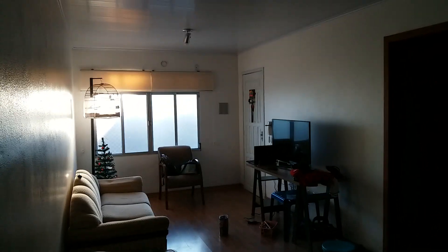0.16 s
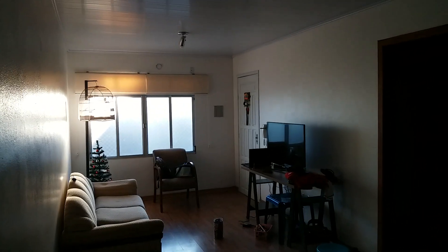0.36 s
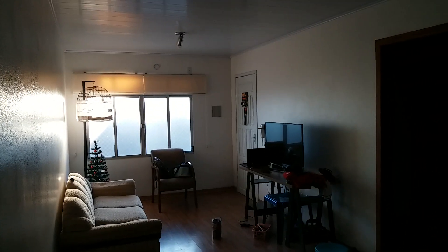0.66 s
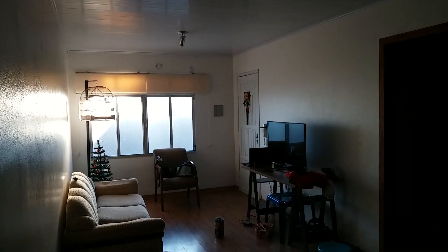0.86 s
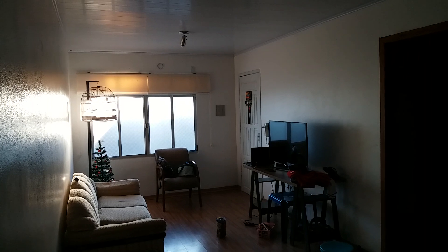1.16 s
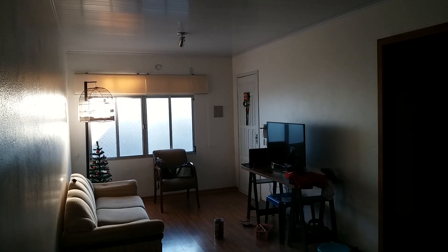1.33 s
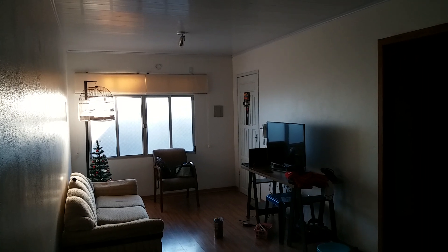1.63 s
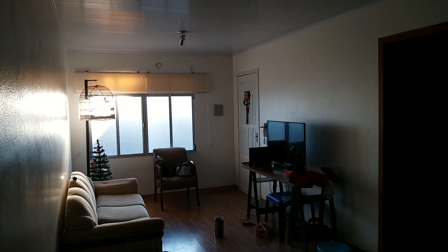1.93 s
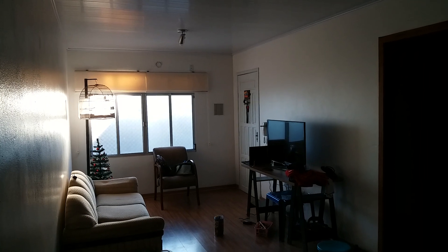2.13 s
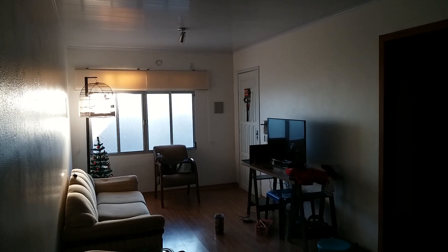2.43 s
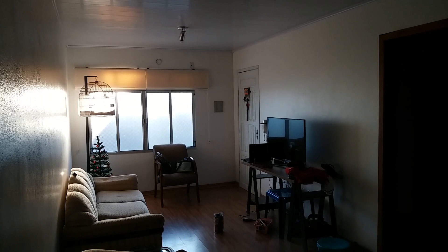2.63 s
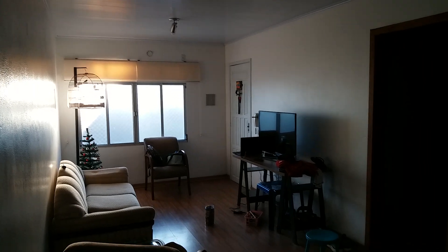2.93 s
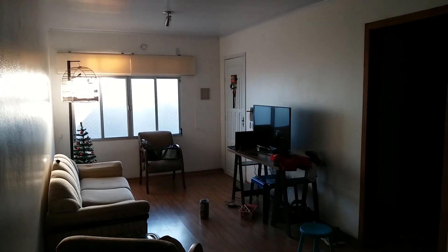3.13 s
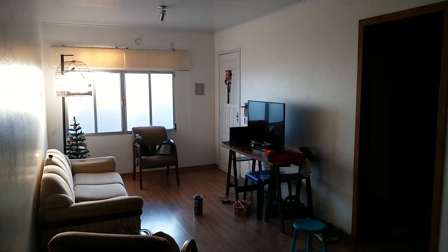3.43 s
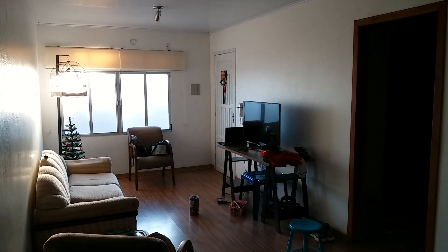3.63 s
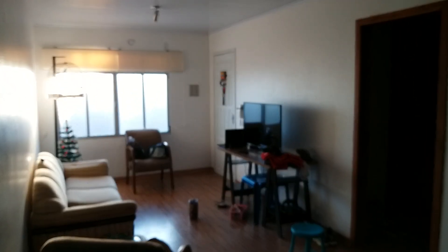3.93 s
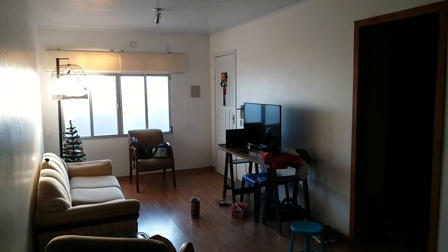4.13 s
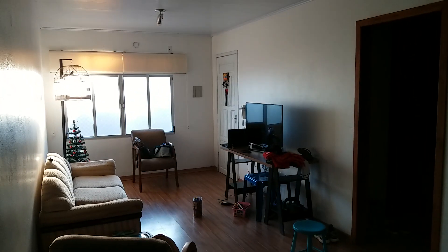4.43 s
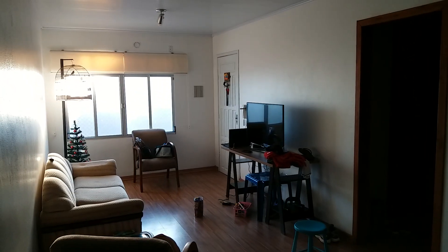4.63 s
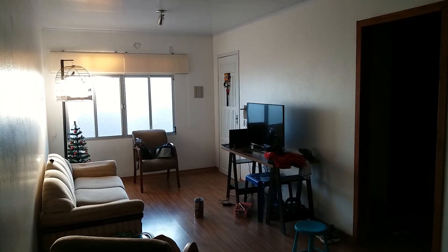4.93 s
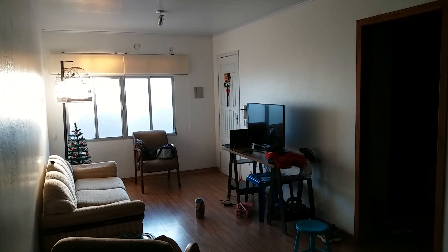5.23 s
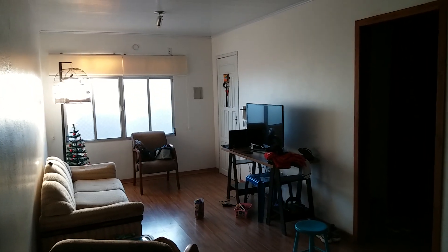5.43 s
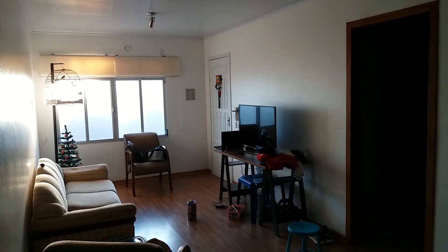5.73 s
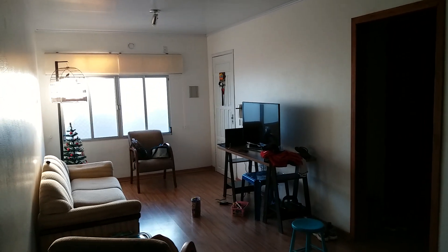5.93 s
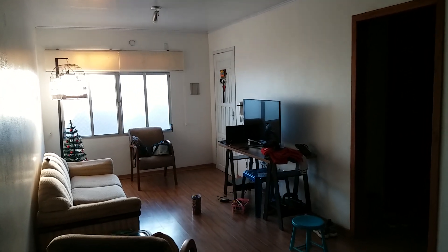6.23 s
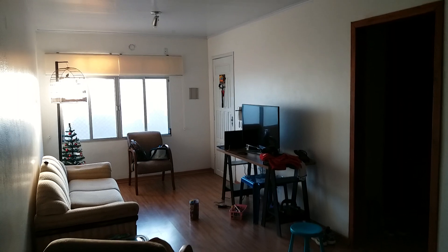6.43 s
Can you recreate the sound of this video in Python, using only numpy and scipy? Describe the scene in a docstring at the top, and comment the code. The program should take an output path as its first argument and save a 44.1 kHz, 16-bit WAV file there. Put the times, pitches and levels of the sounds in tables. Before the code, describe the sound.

Handheld phone in a sparse room, caged finch some metres away. First there is mostly low room tone, a tiny tick, a soft rustle and faint outdoor chirps. A brief raspy call comes early, then a fast tumbling twitter, strongest in its first half, higher and more scattered later. The echo fades into quiet before small taps and a sharp close knock on the left.

```python
"""Caged finch in a ringing room

One harsh call of rasping noise, then a fast song of gliding, buzzing tones with overtones and breath, mostly
room echo: dense decaying noise convolved with the dry bird. Faint far birds are smeared outdoors first.
Underneath lie filtered-noise rumble and hiss, a thin wavering hum, airy rustles and the knocks of fingers
on the phone. An expander leaves quiet passages a little lower than loud ones."""
import sys
import numpy as np
from scipy import signal
from scipy.fft import rfft, irfft, next_fast_len
from scipy.io import wavfile
from scipy.ndimage import uniform_filter1d, map_coordinates

SR = 44100
rng = np.random.default_rng(int(sys.argv[2]) if len(sys.argv) > 2 else 0)


def store_pcm(level_fs):
    """Save levels as 16-bit WAV."""
    pcm = np.round(np.clip(level_fs, -1, 1) * 32767).astype(np.int16)
    wavfile.write(sys.argv[1], SR, np.atleast_2d(pcm).T)


N = 289737

# Levels are those of each source, ahead of the room, the stereo balance and the expander.
# Background colour: pitch_hz, relative level_db
BACKGROUND_COLOUR = [(36, -30.5), (62, -2.5), (100, 0), (165, -2), (300, -10), (600, -19), (1500, -23.5),
                     (2600, -28.5), (4100, -35.5), (6500, -40.5), (12000, -39), (15700, -34.5)]
BACKGROUND_DB = -54.5  # rms of rumble and hiss before the stereo balance
# Hum lines: pitch_hz, rms level_db before the waver, waver_db
HUM_LINES = [(386.5, -74, 2), (773, -63, 2.5)]
# Likeness of left and right in the rumble and hiss: pitch_hz, correlation (-1 to 1)
LEFT_RIGHT_LIKENESS = [(150, 1), (300, .62), (700, 0.44), (1400, -0.25)]
# Stereo balance of the background: pitch_hz, left_over_right_db
BACKGROUND_BALANCE = [(60, 1.5), (300, 3), (750, -1.5), (1400, 1), (4000, 0.5)]
# Fingers on the phone: start_s, level_db, knock pitch_hz
FINGER_TICKS = [(0.384, -36, 6200), (5.957, -31, 2100), (6.473, -36.5, 2480), (6.479, -26, 2270),
                (6.538, -45.5, 2200), (6.5445, -37, 8000), (6.5685, -2.5, 1750)]
# Soft rustles near the phone: centre_s, spread_s, level_db before the flutter
SOFT_RUSTLES = [(0.264, 0.049, -62), (2.75, 0.1, -64.5)]
# Colour of the rustles: pitch_hz, relative level_db
RUSTLE_COLOUR = [(1500, -7), (4000, -12), (8000, -15), (15700, -10.5)]

# One slow wavering whistle far off, point by point: time_s, pitch_hz, level_db
FAR_WHISTLE = [(.005, 2894, -73), (.11, 3110, -77), (.25, 2830, -74), (.4, 1987, -76.5), (.6, 2840, -75)]
# One far chirp, repeated: start_s, top pitch_hz, loudest level_db
FAR_CHIRPS = [(.6, 4190, -75), (.87, 4280, -74.5), (1.17, 4260, -75.5), (1.441, 4210, -75.5),
              (2.27, 4135, -76)]
# Far rising whistles, loudest at once: start_s, length_s, first_hz, last_hz, loudest level_db
FAR_RISES = [(2.947, .12, 1727, 2220, -68.5), (3.437, 0.073, 4320, 4820, -71.5),
             (3.867, 0.16, 1670, 2185, -61.5)]
CHIRP_S, CHIRP_SAG_HZ = 0.073, 218  # length of a chirp, and its whole fall in pitch
CHIRP_LOUDEST = 0.1  # share of the length
CHIRP_SLOPE_DB_PER_S, RISE_SINK_DB_PER_S = 105, 68  # a chirp's swell and fall; a rising whistle's fall

# Stereo balance towards the cage: pitch_hz, left_over_right_db
CAGE_BALANCE = [(2400, -2), (5000, -1), (8500, 11.5), (15000, 0)]
# Echo decay: pitch_hz, t60_s
ROOM_DECAY = [(3000, 0.57), (6000, 0.5), (12000, 0.46)]

# The harsh call's swell, point by point: time_s, level_db
CALL_LEVEL = [(1.655, -61), (1.685, -45.5), (1.738, -43), (1.77, -64)]
# Colour of the call's rasp: pitch_hz, relative level_db
RASP_COLOUR = [(710, -58), (1200, -25), (1900, -11), (2800, 5), (4300, 8.5), (5900, -0.5), (7200, -19),
               (11900, -14.5), (15600, -28)]
# The song, one row a note: start_s, length_s, first_hz, middle_hz, last_hz, loudest level_db,
# loudest point (share 0-1 of the length), buzz depth_hz, overtone boost_db
SONG_NOTES = [ (2.893, 0.12, 3150, 3150, 3050, -42.5, 0.5, 32, -5.5),
              (2.978, 0.087, 2977, 3190, 3730, -36, 0.83, 1, 10),
              (3.217, 0.042, 2804, 2980, 3530, -41, .8, 56, -4),
              (3.242, 0.054, 3434, 3350, 2700, -35, 0.66, 27, 8.5),
              (3.338, .12, 2842, 3132, 3554, -17.5, 0.69, 5, 1.5),
              (3.561, 0.069, 2772, 3107, 3535, -18, 1, 40, -4),
              (3.613, 0.065, 3340, 4134, 5740, -19, 0, 99, 9),
              (3.69, 0.089, 4430, 3902, 3244, -24, 0.54, 100, 6),
              (3.709, 0.043, 3530, 3775, 3930, -13, 0, 36, -4),
              (3.738, 0.076, 3480, 3230, 3090, -16.5, 0.1, 7.2, -3),
              (3.875, 0.059, 2776, 2873, 2700, -35.5, 0, 180, 11),
              (3.878, 0.082, 5270, 4863, 4070, -27, 1, 670, 12.5),
              (3.95, 0.045, 3670, 3247, 3020, -16.5, 0.1, 69, -1.5),
              (3.996, 0.063, 3003, 3033, 3330, -15.5, 1, 1.2, -5.5),
              (4.106, 0.071, 3497, 4080, 3920, -17, 0.5, 50, 5.5),
              (4.169, 0.067, 3870, 3992, 4060, -16.5, 0.35, 0.98, 4),
              (4.156, 0.046, 4620, 4700, 5100, -34, 0.5, 140, -2.3),
              (4.232, 0.046, 3587, 3585, 3590, -20.5, 0.4, 128, 3.8),
              (4.28, 0.084, 3522, 2950, 2965, -21.5, 0.54, 11.4, -3),
              (4.311, 0.05, 4680, 5200, 5720, -31, 0.5, 380, 3),
              (4.326, 0.051, 3280, 3500, 3850, -18, 0.98, 60, 2),
              (4.373, 0.074, 3810, 4432, 4656, -14, 0.56, 40, -2),
              (4.359, 0.054, 8530, 7630, 7000, -37, .95, 220, 7),
              (4.455, 0.12, 5650, 5710, 5440, -23.5, 0.68, 300, 5.5),
              (4.516, 0.028, 7400, 6690, 6470, -19, 0.1, 400, 0),
              (4.545, 0.026, 6160, 5770, 5790, -14.5, 0.3, 330, -3.7),
              (4.514, 0.033, 9470, 8240, 7000, -38, 0.2, 62, 0),
              (4.577, 0.081, 5025, 4860, 4680, -22.5, 0.5, 150, -0.2),
              (4.592, 0.043, 3725, 3815, 3840, -17, 0.4, 60, -7),
              (4.607, 0.044, 3490, 3373, 3210, -19.5, 0.12, 121, -11),
              (4.659, 0.03, 7380, 7390, 7170, -33, 0, 210, 0.5),
              (4.728, 0.04, 4910, 4874, 4810, -19, 0.94, 58, -1.5),
              (4.778, 0.026, 7790, 6840, 6000, -27, 0.99, 400, 6.5),
              (4.842, 0.045, 5590, 5190, 4960, -23, 0.9, 170, -3.5),
              (4.885, 0.051, 4850, 3990, 3450, -32, 0.2, 44, 5.2),
              (4.966, 0.041, 6420, 6100, 5720, -43.5, .6, 300, -3),
              (4.999, 0.064, 3966, 3720, 3640, -29.5, 0.19, 500, -5),
              (5.07, 0.051, 4474, 4310, 4280, -26, 0.53, 86, -4.5),
              (5.137, 0.097, 8120, 6210, 5290, -28.5, 0.55, 250, -1.5),
              (5.267, 0.089, 3674, 3388, 2990, -32.5, 0.3, 250, -22),
              (5.368, 0.063, 4460, 4230, 4276, -27, 0.22, 16, -5.5),
              (5.433, 0.066, 6860, 7605, 6780, -31.5, 0.26, 320, 0),
              (5.482, 0.034, 6440, 5620, 5300, -28, 0.4, 180, -2.8),
              (5.502, 0.066, 5316, 5160, 4990, -23.5, 0, 30, -12),
              (5.582, 0.064, 7430, 6285, 4410, -23, 0.96, 220, -7),
              (5.647, 0.025, 3713, 4000, 4090, -23.5, 0.71, 120, -3),
              (5.672, 0.067, 3584, 3067, 3325, -32.5, 0.34, 1.2, -27),
              (5.767, 0.15, 4748, 4995, 4850, -26.5, 0.18, 44, -4.5),
              (5.827, 0.071, 3595, 3596, 4280, -35, 0.31, 49, 2),
              (5.86, 0.1, 2663, 2798, 2800, -39.5, 0.4, 36, -5), ]
# Song overtones: multiple, level_db for a 4 kHz note before the boost, slope_db per octave of pitch
SONG_OVERTONES = [(2, -36, 24), (3, -31, -5.5), (4, -47.5, -20)]
# Colour of the air past the syrinx: pitch_hz, relative level_db
BREATH_COLOUR = [(900, -18.5), (2500, 1), (8000, -28), (12000, 3), (15700, -0.5)]
SWELL_DB_PER_S, SINK_DB_PER_S = 259, 246.5  # a song note's rise to its loudest point, and fall from it
TOP_HZ = 15760  # band limit of the whole sound


def amp(db):
    """Decibels to amplitude."""
    return 10 ** (np.asarray(db) / 20)


def unit(x):
    """x scaled to an rms of 1."""
    return x / np.sqrt(np.mean(x ** 2) + 1e-20)


def along(points, hz):
    """A curve through (pitch_hz, value) points on a log axis."""
    f, v = np.transpose(points)
    return np.interp(np.log(hz + 1), np.log(f + 1), v)


def wobble(rate):
    """A smooth random curve with rate knots a second."""
    knots = rng.standard_normal(int(N * rate / SR) + 4)
    return map_coordinates(knots, [np.arange(N) * rate / SR])


def filtered(x, response):
    """x shaped by a response of frequency."""
    m = next_fast_len(N + SR // 2)
    return irfft(rfft(x, m) * response(np.fft.rfftfreq(m, 1 / SR)), m)[..., :N]


def leaning(points):
    """Left and right gains that split a balance in dB evenly between the sides."""
    return lambda hz: amp(np.outer([.5, -.5], along(points, hz)))


def coloured(spectrum, channels):
    """Filtered noise with an rms of 1."""
    noise = rng.standard_normal((channels, N))
    return unit(filtered(noise, lambda hz: amp(along(spectrum, hz))))


def rumble_and_hiss():
    """Patchy coloured noise, the same on both sides in the bass and wider above."""
    z = signal.stft(rng.standard_normal((2, N)), nperseg=512)[2]
    # random patches, smoothed over frequency and then over time
    patches = rng.standard_normal(z.shape[1:])
    patches = uniform_filter1d(uniform_filter1d(patches, 8, 0), 20, 1)
    pair = signal.istft(z * amp(1.1 * unit(patches)), nperseg=512)[1][:, :N]

    def mid_side_gains(hz):
        # cos^2 - sin^2 of this angle gives the wanted left-right correlation
        angle = np.arccos(np.clip(along(LEFT_RIGHT_LIKENESS, hz), -1, 1)) / 2
        return amp(along(BACKGROUND_COLOUR, hz)) * [np.cos(angle), np.sin(angle)]

    mid, side = filtered(pair, mid_side_gains)
    return amp(BACKGROUND_DB) * unit(np.array([mid + side, mid - side]))


def hum():
    """Thin sine lines that waver slowly in level and phase."""
    t = np.arange(N) / SR
    out = np.zeros(N)
    for hz, db, waver_db in HUM_LINES:
        level = np.sqrt(2) * amp(db + waver_db * wobble(3.494))
        out += level * np.sin(2 * np.pi * hz * t + 0.17 * wobble(9.2))
    return out


def background():
    """Rumble, hiss and hum under one stereo balance that varies with frequency."""
    return filtered(rumble_and_hiss() + hum(), leaning(BACKGROUND_BALANCE))


def rustles():
    """Brief soft swells of airy noise with a fast flutter in level."""
    t = np.arange(N) / SR
    swells = sum(amp(db) * np.exp(-((t - s) / spread) ** 2) for s, spread, db in SOFT_RUSTLES)
    return swells * amp(1.9 * wobble(60)) * coloured(RUSTLE_COLOUR, channels=2)


def ticks():
    """Each contact is a knock of a few cycles with a noisy crack, stronger at the left port."""
    out, t = np.zeros(N + SR), np.arange(400) / SR
    for s, db, hz in FINGER_TICKS:
        knock = np.sin(2 * np.pi * hz * t) * amp(-9 * hz * t)  # loses 9 dB a cycle
        crack = 0.12 * amp(-60 * t / 0.007) * rng.standard_normal(len(t))
        attack = np.minimum(hz * t, 1)  # one cycle long
        out[round(s * SR):][:len(t)] += amp(db) * attack * (knock + crack)
    return out[:N] * amp([[0], [-10]])


def note(start, length, first_hz, middle_hz, last_hz, db, loudest, swell_db, sink_db):
    """Pitch bends as a parabola through three pitches; level swells to its loudest point, then sinks."""
    u = np.linspace(0, 1, 2 * 10 + 1)
    bend = (2 * middle_hz - first_hz - last_hz) * 2 * u * (1 - u)
    hz = first_hz + (last_hz - first_hz) * u + bend
    late = (u - loudest) * length  # seconds after the loudest point
    drop_db = np.where(late < 0, -swell_db * late, sink_db * late)
    return list(zip(start + u * length, hz, db - drop_db))


def whistles(notes, overtones, waver, buzz_rate, fade):
    """Gliding tones whose pitch a buzz shakes fast and unevenly; returns them and the flow of air."""
    out, effort = np.zeros(N), np.zeros(N)
    shake = 2 * np.tanh(wobble(buzz_rate) / 2)  # soft-limited to within +-2
    for shape, buzz, rich_db in notes:
        s, *cols = np.transpose(sorted(shape))
        n = np.arange(round(s[0] * SR), round(s[-1] * SR))
        hz, db = [np.interp(n / SR, s, c) for c in cols]
        pitch = hz + (waver * hz + buzz) * shake[n]
        phase = 2 * np.pi * np.cumsum(pitch) / SR
        tone = np.sin(phase)
        for k, overtone_db, slope_db in overtones:
            strength = amp(overtone_db + rich_db + slope_db * np.log2(hz / 4000))
            in_band = k * pitch < SR / 2.1
            tone += strength * in_band * np.sin(k * phase)
        edge = np.clip(np.minimum(n - n[0], n[-1] - n) / (fade * SR), 0, 1)
        level = amp(db) * np.sin(edge * np.pi / 2) ** 2
        out[n] += np.sqrt(2) * level * tone
        effort[n] += level * (0.3 + abs(buzz) / 300)  # a buzz spills more air
    return out, effort


def far_birds():
    """Bare gliding tones with a fast waver: one slow whistle, a repeated chirp and rising whistles."""
    shapes = [FAR_WHISTLE]
    for s, hz, db in FAR_CHIRPS:
        shapes.append(note(s, CHIRP_S, hz, hz - CHIRP_SAG_HZ / 4, hz - CHIRP_SAG_HZ, db,
                           CHIRP_LOUDEST, CHIRP_SLOPE_DB_PER_S, CHIRP_SLOPE_DB_PER_S))
    for s, length, first, last, db in FAR_RISES:
        shapes.append(note(s, length, first, (first + last) / 2, last, db, 0, 0, RISE_SINK_DB_PER_S))
    notes = [(shape, 35, 0) for shape in shapes]
    return whistles(notes, [], waver=.013, buzz_rate=90, fade=0.012)[0]


def room(x, direct_db, build_up):
    """Direct sound, then a dense echo, different at each port, that builds up fast and dies by band."""
    hz, t, z = signal.stft(rng.standard_normal((2, SR)), SR, nperseg=256)
    decay = amp(-60 * t / along(ROOM_DECAY, hz)[:, None])
    tail = signal.istft(z * decay, SR, nperseg=256)[1]
    tail *= 1 - np.exp(-np.arange(tail.shape[1]) / (build_up * SR))
    tail /= np.linalg.norm(tail[0])
    tail[:, 0] = amp(direct_db)  # direct sound against the echo
    echoing = signal.fftconvolve(x[None], tail, axes=1)[:, :N]
    return filtered(echoing, leaning(CAGE_BALANCE))


def call():
    """A rasp of air noise through the throat that swells, holds and stops."""
    s, db = np.transpose(CALL_LEVEL)
    level_db = np.interp(np.arange(N) / SR, s, db, left=-np.inf, right=-np.inf)
    return amp(level_db) * coloured(RASP_COLOUR, channels=1)[0]


def song():
    """Whistles, sweeps and buzzes with overtones, and breath noise that follows the flow of air."""
    notes = [(note(*shape, SWELL_DB_PER_S, SINK_DB_PER_S), buzz, rich_db)
             for *shape, buzz, rich_db in SONG_NOTES]
    tones, effort = whistles(notes, SONG_OVERTONES, waver=.004, buzz_rate=700, fade=.016)
    breath = effort * amp(-32.0) * coloured(BREATH_COLOUR, channels=1)[0]
    return tones + breath


def scene():
    """Finch and far birds ring in the room; background, rustles and ticks stay outside its echo."""
    # walls outdoors smear the far birds before the room does
    outside = room(far_birds(), direct_db=7.5, build_up=0.012)[0]
    indoors = room(song() + call() + outside, direct_db=-16.5, build_up=0.006)
    return background() + rustles() + ticks() + indoors


def record(dry):
    """An expander lifts loud sound by up to 4.8 dB; nothing is kept above the band limit."""
    power = uniform_filter1d(np.mean(dry ** 2, 0), round(.15 * SR))
    level_db = 10 * np.log10(np.abs(power) + 1e-12)
    lift_db = 4.8 * np.clip((level_db + 57) / 22, 0, 1)  # from -57 dB, full at -35 dB
    return filtered(dry * amp(lift_db), lambda hz: hz < TOP_HZ)


dry = scene()
out = record(dry)
store_pcm(out)
```